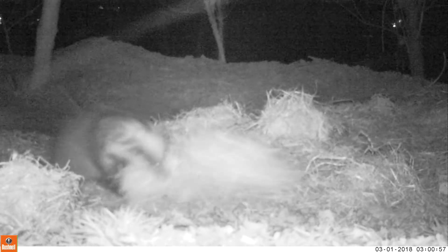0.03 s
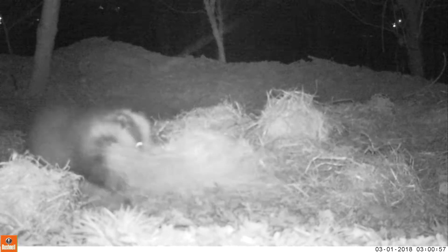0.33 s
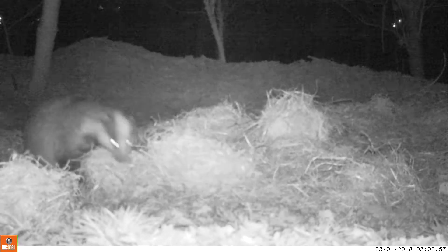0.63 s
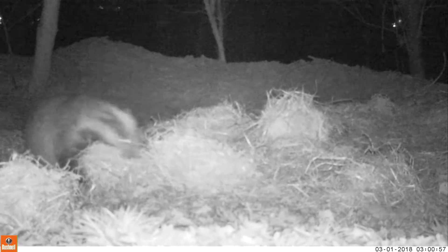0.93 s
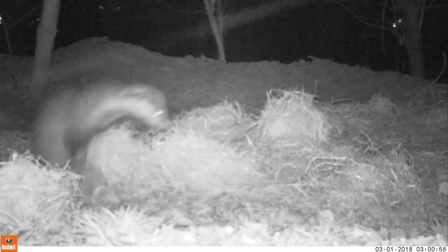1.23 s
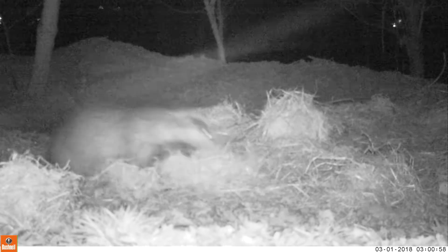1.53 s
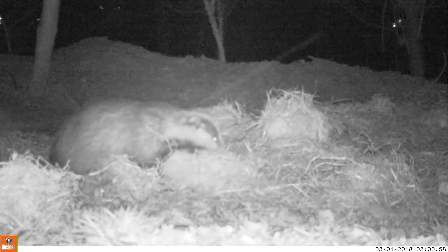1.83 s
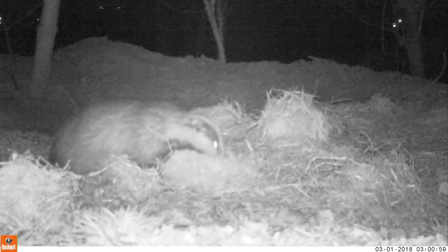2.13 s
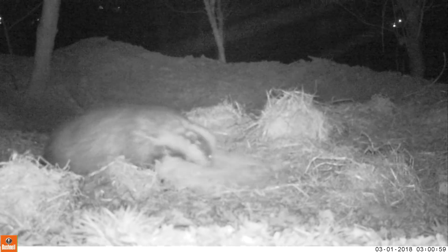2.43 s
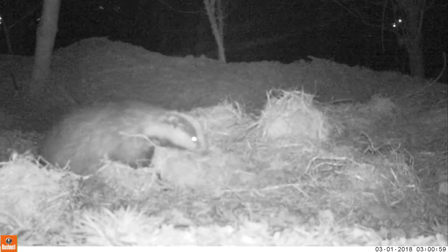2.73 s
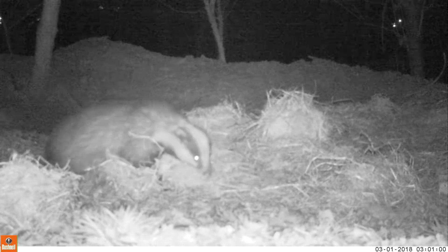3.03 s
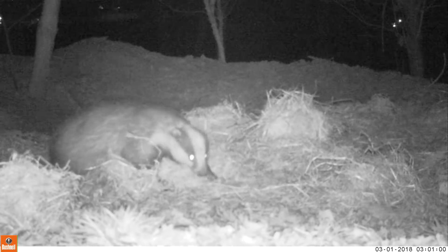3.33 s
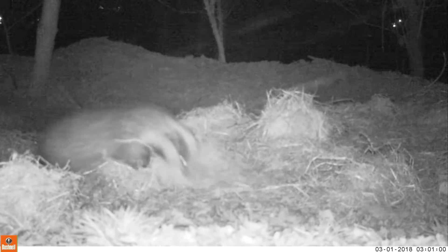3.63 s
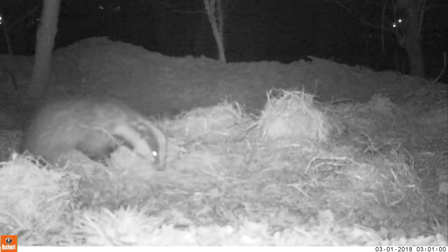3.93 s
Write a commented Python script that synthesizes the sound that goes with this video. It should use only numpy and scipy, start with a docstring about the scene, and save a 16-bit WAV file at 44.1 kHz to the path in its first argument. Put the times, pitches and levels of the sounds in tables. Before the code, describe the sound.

Dry straw rustles softly as a badger rakes it a few metres away, in quick pulls through the first 0.7 seconds. More crackly swells come around 1.6 and 2.7 seconds, then a faint slide and a stronger pull near 3.9. Stalks snap lightly here and there. An uneven low rumble with dull bumps eases after 3 seconds. Steady hiss lies behind, with one click at about 1.4 seconds.

```python
"""A badger rakes dry straw backwards over a woodland floor at night, a few metres from a trail camera.
Each pull of the paws is a swell of tiny stalk clicks and sliding hiss; a few stalks snap on their own.
The camera's one microphone also carries an uneven low rumble with dull bumps in it.
Behind it all lies the recorder's steady hiss, and the recorder clicks once."""
import sys
import numpy as np
from scipy import signal
from scipy.fft import rfft, irfft
from scipy.io import wavfile
from scipy.ndimage import uniform_filter1d

SR = 44100
rng = np.random.default_rng(int(sys.argv[2]) if len(sys.argv) > 2 else 0)


def output_pcm(signal):
    """Save a mono or channel-first signal as 16-bit PCM at the path in sys.argv[1].

    Samples are clipped to [-1, 1] before scaling.
    """
    pcm = np.clip(np.atleast_2d(signal).T, -1, 1) * 32767
    wavfile.write(sys.argv[1], SR, np.round(pcm).astype(np.int16))


N = 176400

# light stalks brushing, as heard at the camera (frequency [Hz], relative level [dB])
STALK_SPECTRUM = [(1500, -31), (3200, -8), (4300, -2), (5300, -4.5), (6900, -8), (7600, -10), (8400, -5),
                  (9400, -3.5), (10200, -7), (11300, -0.5), (12400, 3.5), (13300, -2), (14000, -5)]


def straw(t):
    """Each pull of the paws swells and fades; hard ones drag the whole bundle, which sounds fuller."""
    # pulls through the straw (peak time [s], rise [s], fall [s], level [dB], bundle weighting [dB])
    pulls = [(0.19, .115, 0.11, -58.5, 0.5), (0.29, 0.064, 0.043, -62, 1), (0.40, 0.044, 0.024, -65, 4.5),
             (0.59, 0.087, 0.079, -58, 3), (1.24, 0.092, 0.06, -70.5, -15), (1.53, 0.096, 0.19, -66, -2),
             (1.675, 0.066, 0.045, -58, -0.5), (2.00, 0.049, 0.043, -68.5, -14),
             (2.36, 0.032, 0.055, -72.5, -10), (2.485, 0.041, 0.053, -66, -8), (2.70, 0.1, 0.1, -62, -2.5),
             (3.14, 0.21, 0.19, -75, -5), (3.34, 0.037, .045, -68.5, -19), (3.75, 0.12, 0.18, -65.5, -18),
             (3.93, 0.065, 0.11, -58, 1.5)]
    # the dragged bundle (frequency [Hz], relative level [dB])
    bundle_spectrum = [(500, -15), (1200, -8.5), (2000, -10.5), (3100, -7), (3700, -4), (4200, 6),
                       (4900, -3), (5900, -7), (7000, -3.5), (7700, -30), (9000, -14.5), (14000, -19)]
    shape, bundle_trim_db = 1.3, -5  # shape: 1 = pointed, 2 = bell
    stalk_power, bundle_power = 0, 0
    for peak, rise, fall, db, bundle_db in pulls:
        from_peak = np.abs(t - peak) / np.where(t < peak, rise, fall)
        swell = undb(db) * np.exp(-from_peak ** shape / 2 * shape)
        stalk_power += swell ** 2
        bundle_power += (swell * undb(bundle_db)) ** 2
    catching = undb(0.65 * drift(rate_hz=43))  # the level flutters as the straw catches
    stalks = crackle(clicks_per_s=9000) * np.sqrt(stalk_power) * catching
    bundle = crackle(clicks_per_s=2500) * np.sqrt(bundle_power) * catching
    return colour(stalks, STALK_SPECTRUM) + undb(bundle_trim_db) * colour(bundle, bundle_spectrum)


def crackle(clicks_per_s):
    """Dense stalk clicks, mostly tiny and a few large, over the smooth hiss of sliding."""
    spread_db, slide_db = 2.6, -2
    hits = rng.random(N) < clicks_per_s / SR
    sizes = undb(spread_db * np.minimum(rng.exponential(size=N), 5))
    clicks = unit(hits * sizes * np.sign(noise()))
    return unit(clicks + undb(slide_db) * noise())


def snaps(t):
    """Lone stalks break with a tick of a millisecond or two; thick ones ring briefly."""
    # breaking stalks (time [s], level [dB], ring relative to tick [dB])
    breaks = [(0.576, -56, 1), (0.585, -58, -3), (0.641, -54, 3.5), (0.780, -57, -10), (1.301, -62, -10),
              (1.549, -53, -12), (1.666, -57, 2), (1.686, -55, -8), (1.708, -51, -16), (2.070, -61, -8),
              (2.3083, -59, -15), (3.19, -60, -5), (3.3043, -55, -22), (3.634, -57, -11), (3.728, -51, -18),
              (3.885, -54, -4)]
    # ring of a thick stem (frequency [Hz], relative level [dB])
    stem_spectrum = [(2000, -15), (3300, -8), (4000, 12), (4900, 2), (5700, -3), (9000, -15)]
    tick_decay_s, ring_decay_s = 0.00082, 0.0036
    ticks, rings = 0, 0
    for at, db, ring_db in breaks:
        onset, age = undb(db) * (t >= at), np.abs(t - at)
        ticks += onset * np.exp(-age / tick_decay_s)
        rings += onset * undb(ring_db) * np.exp(-age / ring_decay_s)
    return colour(ticks * noise(), STALK_SPECTRUM) + colour(rings * noise(), stem_spectrum)


def rumble(t):
    """Uneven low rumble at the microphone, in two bands; it comes in lumps and eases in the last second."""
    # tone of the deep and upper bands (frequency [Hz], relative level [dB])
    deep_spectrum = [(8, 1.5), (18, -2.5), (30, 4), (50, -5), (70, -7.5), (100, -14), (150, -29.5),
                     (250, -30.5), (600, -74.5)]
    upper_spectrum = [(40, -11.5), (70, -7.5), (100, -1), (135, -4), (190, -14.5), (270, -24), (450, -31),
                      (900, -62)]
    # rise and fall of each band (time [s], relative level [dB])
    deep_contour = [(0.0, -45.5), (0.04, -39.5), (1.2, -38.5), (1.7, -41.5), (2.1, -37), (2.17, -42.5),
                    (2.27, -36.5), (2.8, -42), (2.87, -37), (3.04, -46.5), (3.55, -41.5), (3.78, -51.5),
                    (4.0, -41)]
    upper_contour = [(0.0, -45.5), (0.27, -54), (0.45, -45.5), (0.65, -50), (1.05, -50.5), (1.3, -47.5),
                     (1.65, -46), (1.76, -55.5), (1.82, -43.5), (2.1, -44.5), (2.17, -54), (2.45, -42),
                     (2.7, -45), (2.97, -59.5), (3.35, -57.5), (3.52, -54), (4.0, -57.5)]
    deep_trim_db, upper_trim_db = 3, -0.5
    lumps = undb(2.5 * drift(rate_hz=25))
    deep = steady(colour(noise(), deep_spectrum), window_s=0.12) * curve(t, deep_contour)
    upper = steady(colour(noise(), upper_spectrum), window_s=0.1) * curve(t, upper_contour)
    return lumps * (undb(deep_trim_db) * deep + undb(upper_trim_db) * upper)


def thuds(t):
    """Soft low bumps, each a cycle or two long at its own pitch, that swell out of the rumble."""
    # dull bumps (time [s], level [dB], pitch [Hz])
    bumps = [(0.057, -38.5, 145), (0.134, -31.5, 71), (0.393, -26.5, 83), (0.455, -31.5, 75),
             (0.729, -36, 171), (0.971, -28.5, 47), (1.115, -36, 141), (1.156, -29.5, 70),
             (1.211, -27, 70.4), (1.274, -38, 137), (1.322, -36, 153), (1.576, -25.5, 49),
             (1.858, -29.5, 91), (1.931, -44, 143), (1.983, -31, 63), (2.034, -31, 76), (2.058, -38.5, 215),
             (2.072, -30, 145), (2.108, -28.5, 78), (2.394, -27, 50), (2.444, -32, 129),
             (2.607, -32.5, 122), (2.701, -26.5, 84), (2.714, -38.5, 168), (2.746, -33.5, 99),
             (3.352, -33.5, 47), (3.519, -39.5, 111), (3.779, -43.5, 220)]
    half_length_cycles, shape = 0.67, 1.44  # shape: 1 = pointed, 2 = bell
    out = 0
    for at, db, hz in bumps:
        cycles = (t - at) * hz
        swell = np.exp(-np.abs(cycles / half_length_cycles) ** shape)
        out += undb(db) * swell * np.sin(2 * np.pi * (cycles + rng.random()))
    return out


def recorder_noise(t):
    """The recorder's steady hiss, resonant near 4.3 kHz, and its click: a voltage step that drains away."""
    # noise floor (frequency [Hz], relative level [dB])
    hiss_spectrum = [(100, 16.5), (250, 19.5), (400, 14.5), (630, 8.5), (1000, 2.5), (1500, -1),
                     (2200, -2.5), (3000, -3.5), (3600, -2.5), (4100, 1.5), (4450, 2.5), (4900, -5),
                     (5700, -10), (7500, -15.5), (10500, -16), (12400, -14), (14000, -16)]
    hiss_db = -58.5
    click_s, click_db, drain_s = 1.4233, -27.5, 0.006
    click = undb(click_db) * (t >= click_s) * np.exp(-np.abs(t - click_s) / drain_s)
    return undb(hiss_db) * colour(noise(), hiss_spectrum) + click


def colour(x, spectrum):
    """Filter by (Hz, dB) points and a treble edge, keeping the power of a white input."""
    # edge where straw and hiss die away (frequency [Hz], gain [dB])
    treble_edge = [(13500, 0), (14200, -45)]
    hz, db = np.array(spectrum).T
    freqs = np.maximum(np.fft.rfftfreq(N, 1 / SR), 1)
    gain = undb(np.interp(np.log(freqs), np.log(hz), db)) * curve(freqs, treble_edge)
    return irfft(rfft(x) * unit(gain), N)


def steady(x, window_s):
    """Even out the slow swings of a noise."""
    return x / np.sqrt(uniform_filter1d(x ** 2, int(window_s * SR)))


def drift(rate_hz):
    """Smooth random drift of rms 1."""
    width = int(SR / rate_hz)
    return unit(uniform_filter1d(uniform_filter1d(noise(), width), width))


def curve(axis, points):
    """Gain along (s or Hz, dB) points."""
    return undb(np.interp(axis, *np.array(points).T))


def noise():
    """White noise of rms 1."""
    return rng.standard_normal(N)


def undb(db):
    """Decibels to gain."""
    return 10 ** (np.asarray(db) / 20)


def unit(x):
    """Scale to rms 1."""
    return x / np.sqrt(np.mean(x ** 2))


def scene():
    """Straw a few metres from one microphone, over rumble and recorder noise."""
    t = np.arange(N) / SR
    return (straw(t) + snaps(t) + rumble(t) + thuds(t) + recorder_noise(t))[None]


def record(dry):
    """The camera's recorder cuts the top steeply."""
    top_hz = 16200
    return signal.sosfilt(signal.ellip(10, .2, 70, top_hz, fs=SR, output="sos"), dry)


dry = scene()
out = record(dry)
output_pcm(out)
```